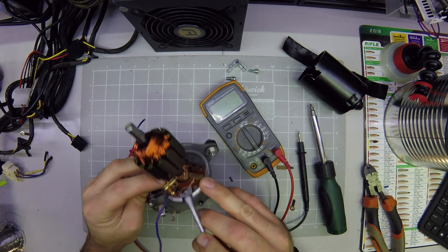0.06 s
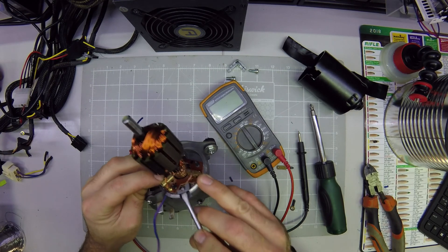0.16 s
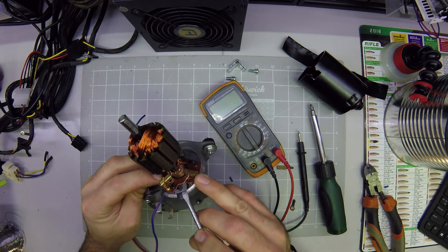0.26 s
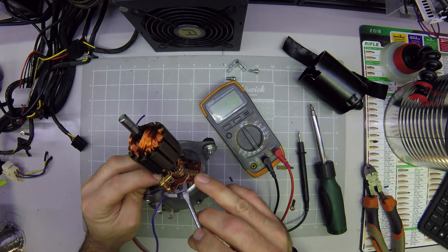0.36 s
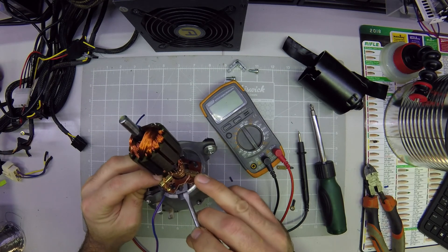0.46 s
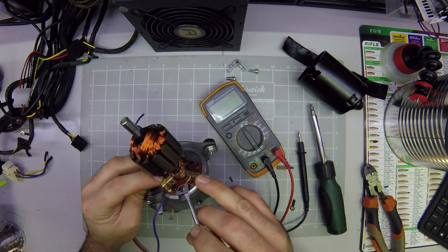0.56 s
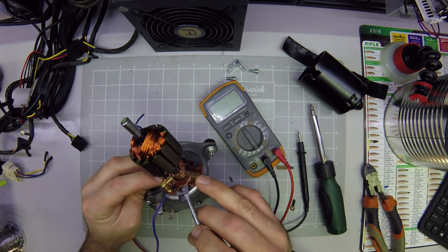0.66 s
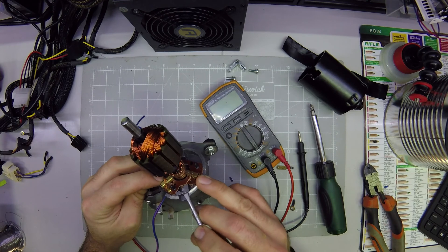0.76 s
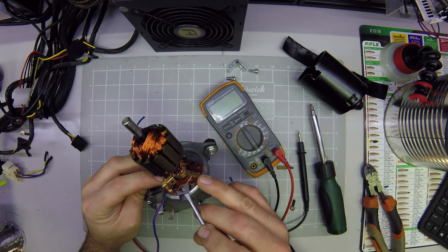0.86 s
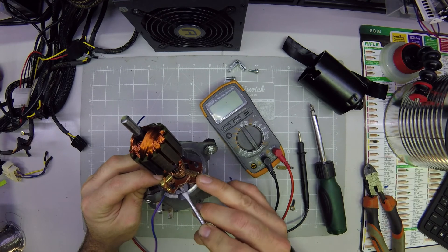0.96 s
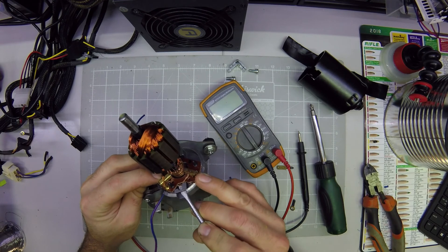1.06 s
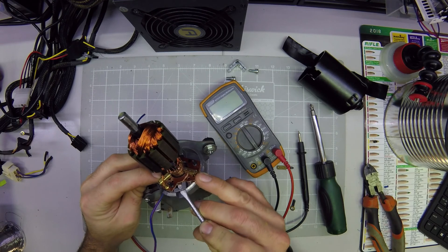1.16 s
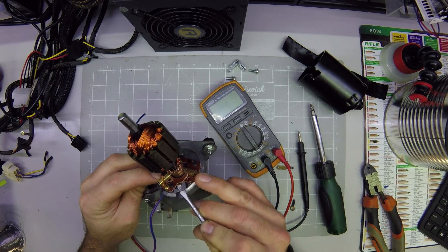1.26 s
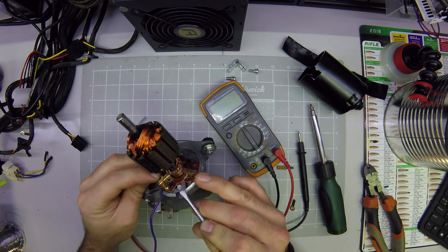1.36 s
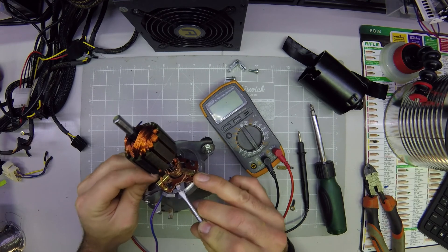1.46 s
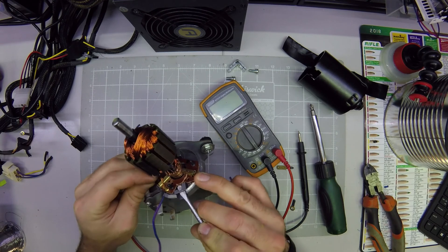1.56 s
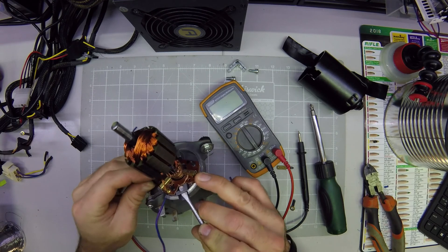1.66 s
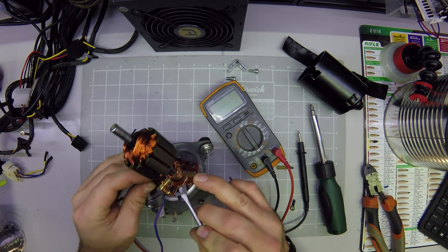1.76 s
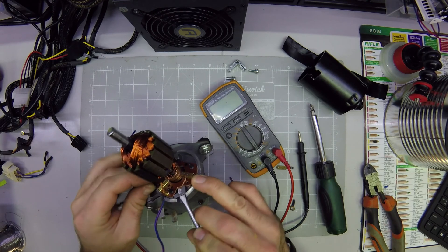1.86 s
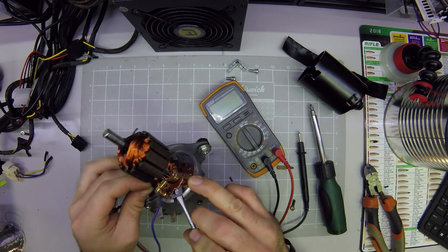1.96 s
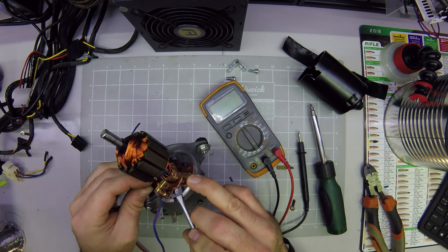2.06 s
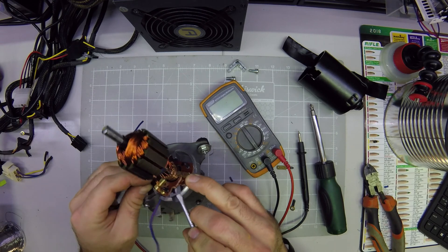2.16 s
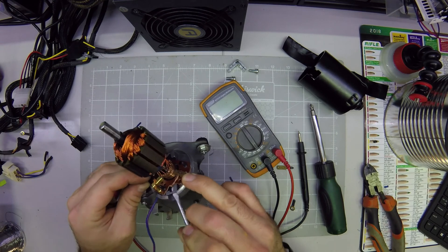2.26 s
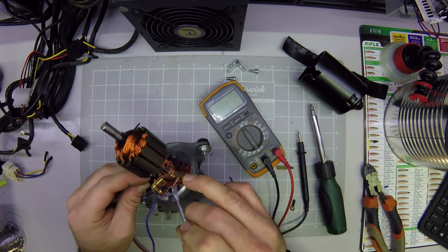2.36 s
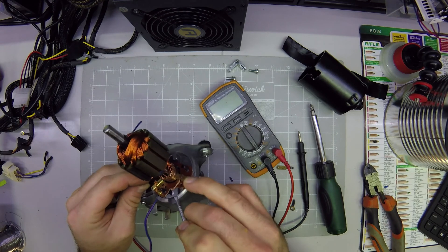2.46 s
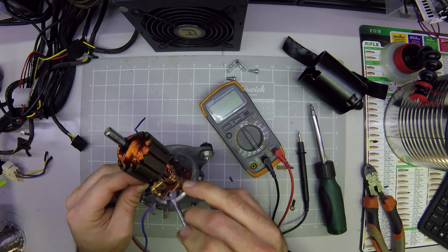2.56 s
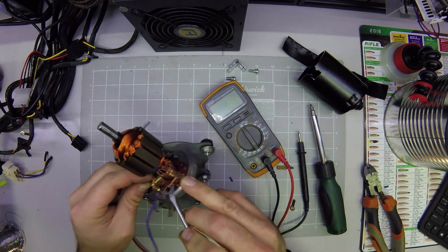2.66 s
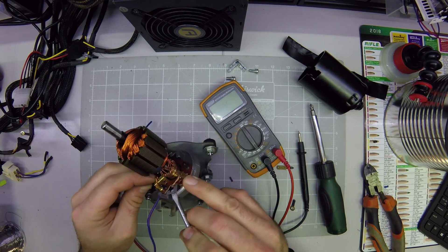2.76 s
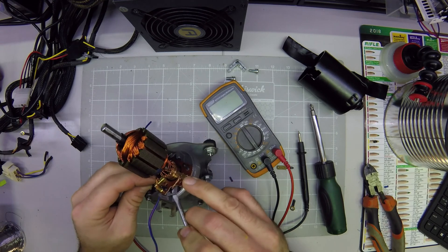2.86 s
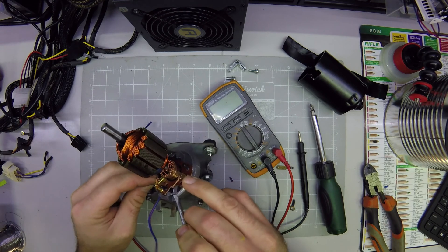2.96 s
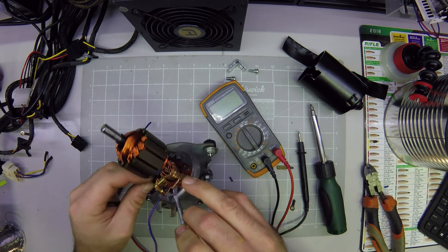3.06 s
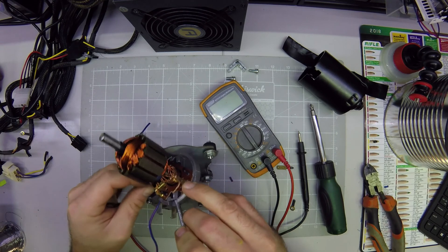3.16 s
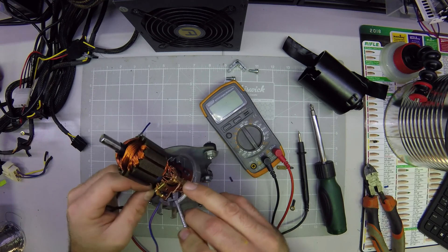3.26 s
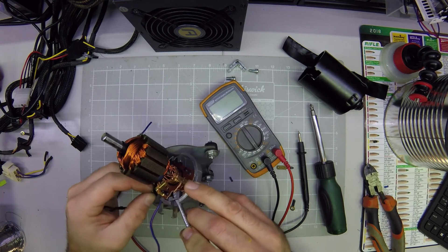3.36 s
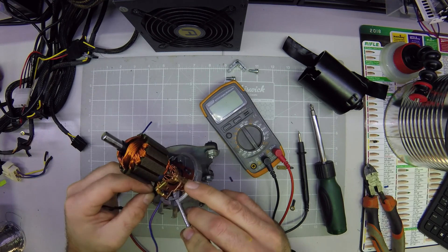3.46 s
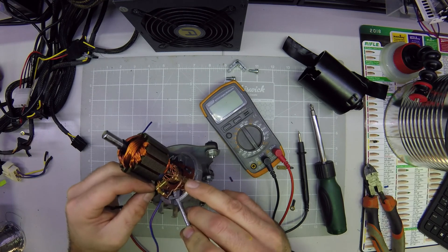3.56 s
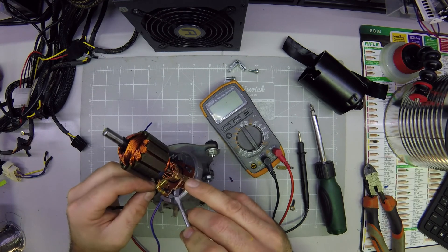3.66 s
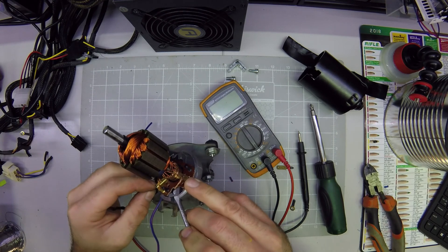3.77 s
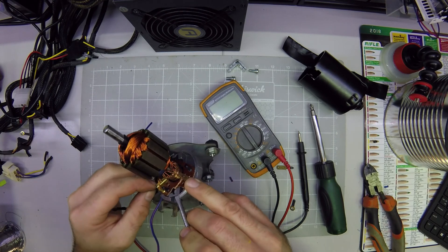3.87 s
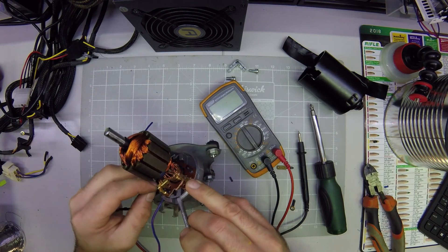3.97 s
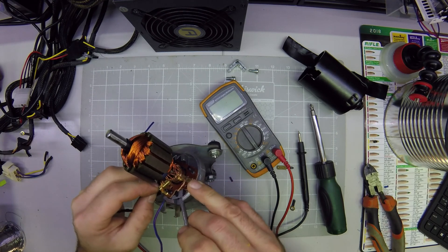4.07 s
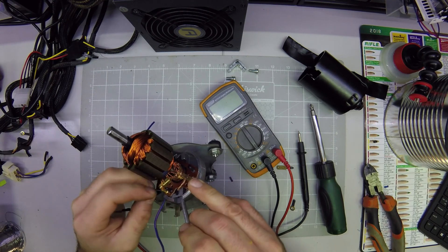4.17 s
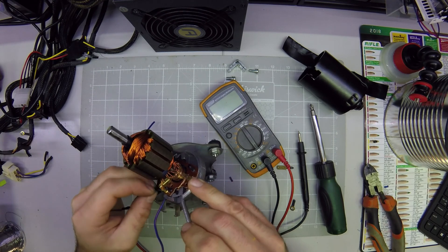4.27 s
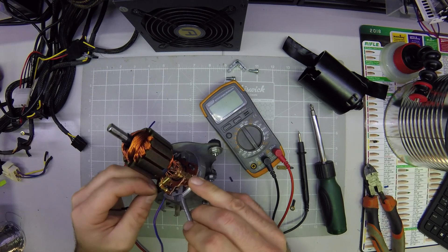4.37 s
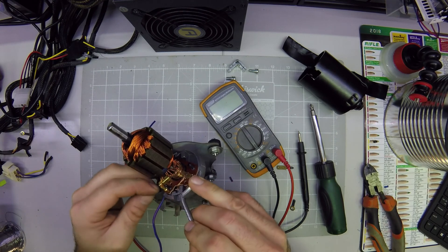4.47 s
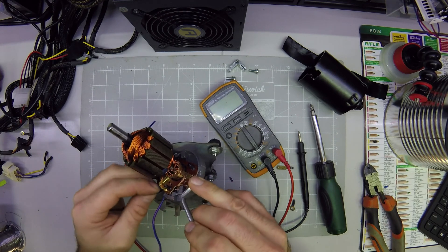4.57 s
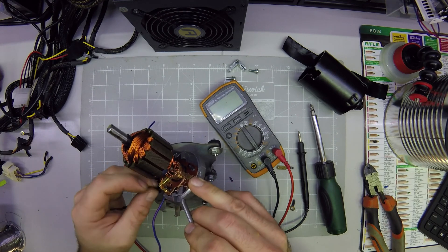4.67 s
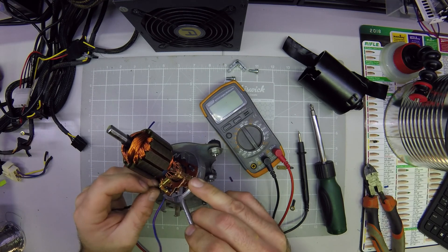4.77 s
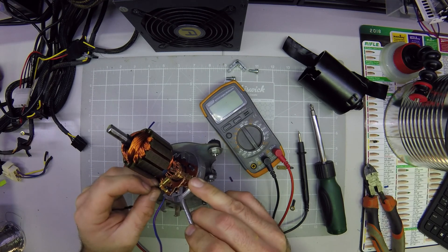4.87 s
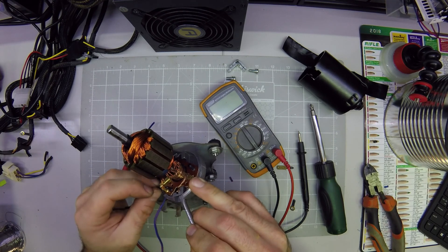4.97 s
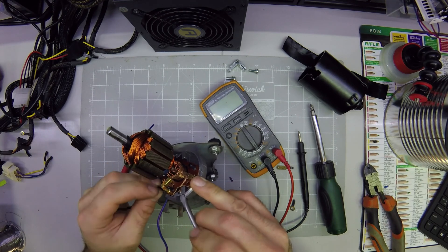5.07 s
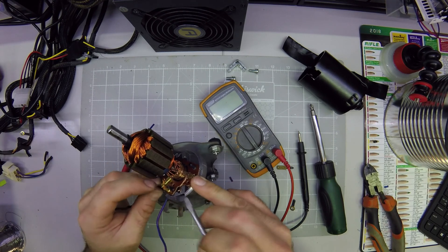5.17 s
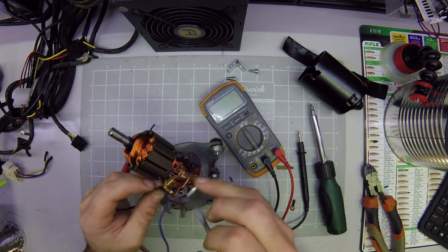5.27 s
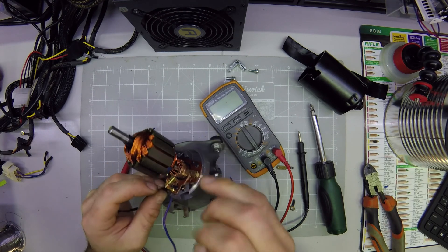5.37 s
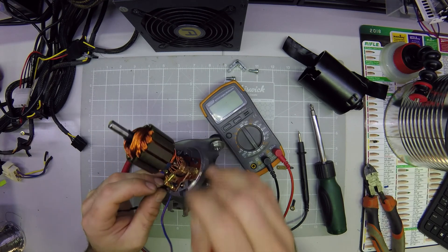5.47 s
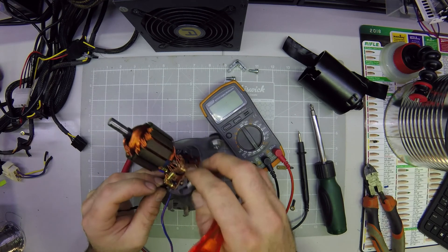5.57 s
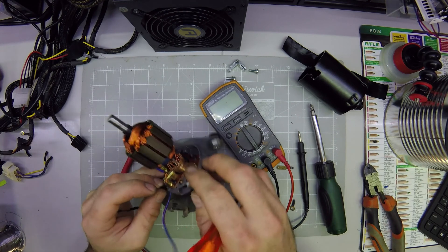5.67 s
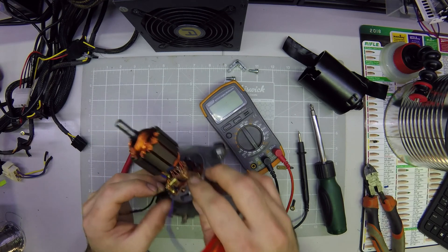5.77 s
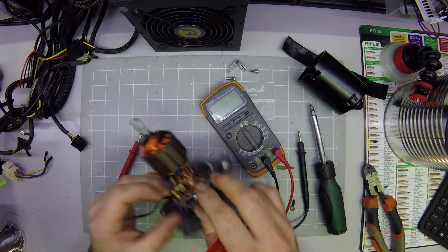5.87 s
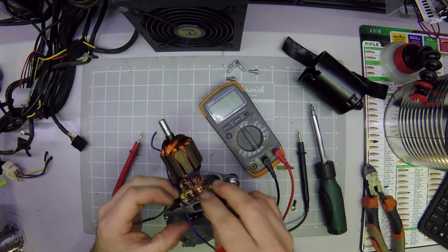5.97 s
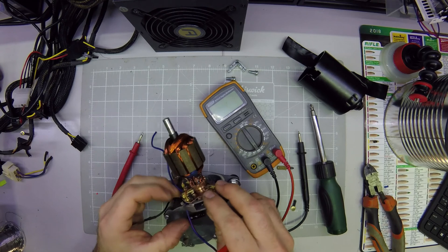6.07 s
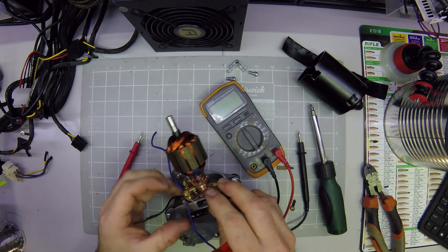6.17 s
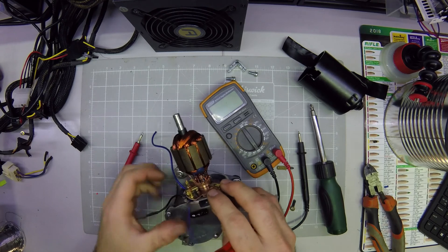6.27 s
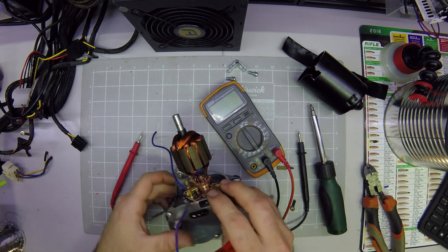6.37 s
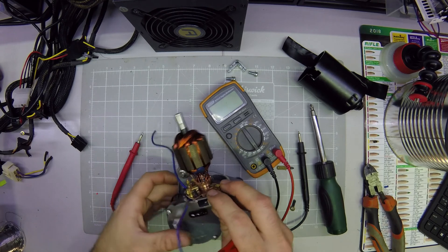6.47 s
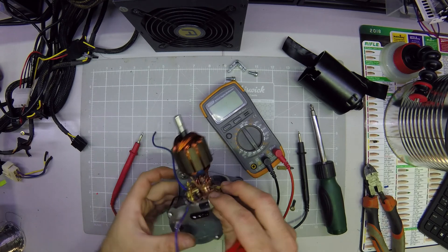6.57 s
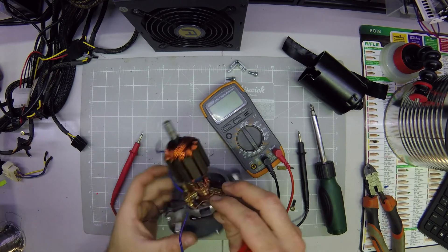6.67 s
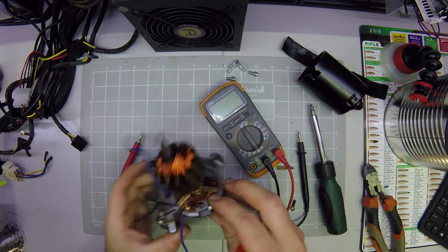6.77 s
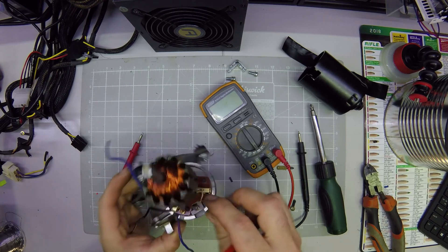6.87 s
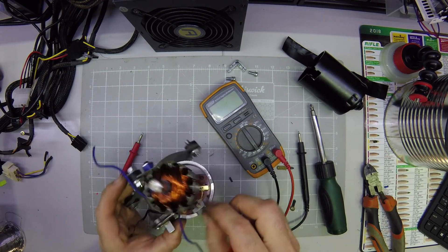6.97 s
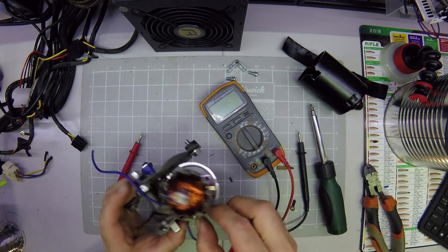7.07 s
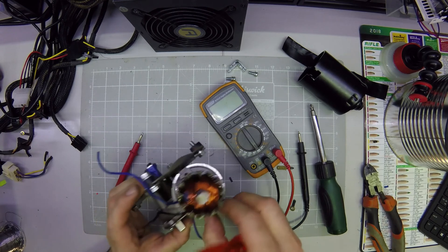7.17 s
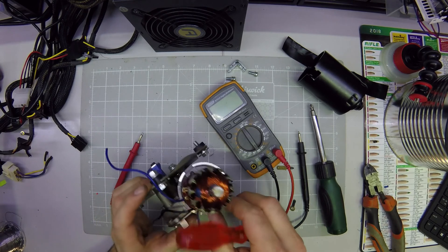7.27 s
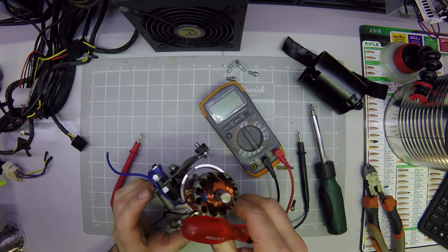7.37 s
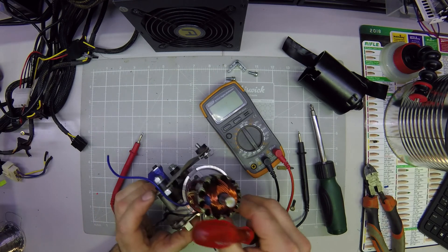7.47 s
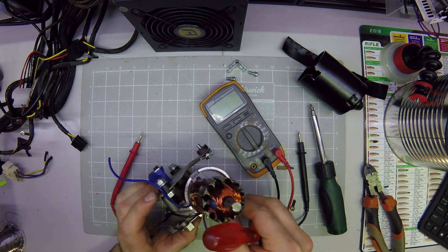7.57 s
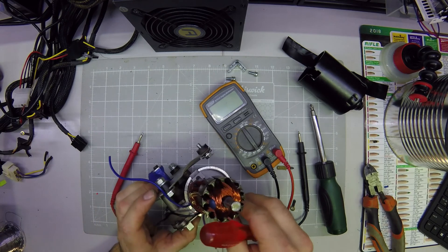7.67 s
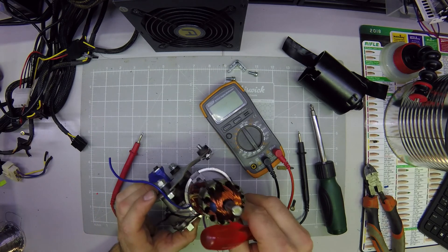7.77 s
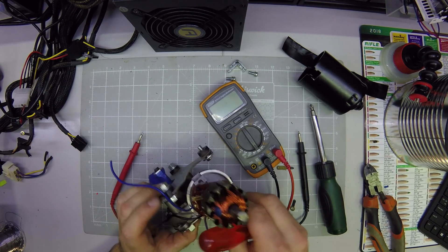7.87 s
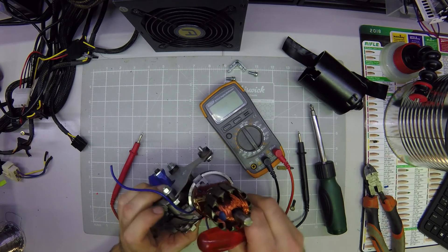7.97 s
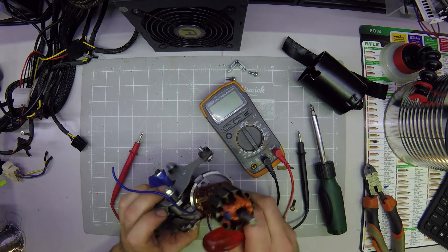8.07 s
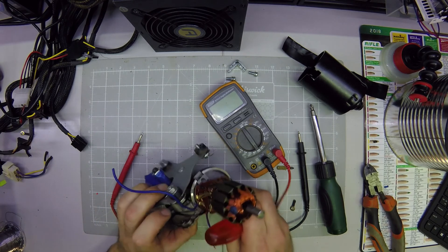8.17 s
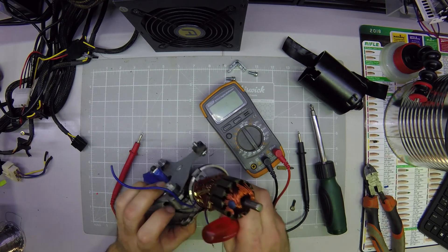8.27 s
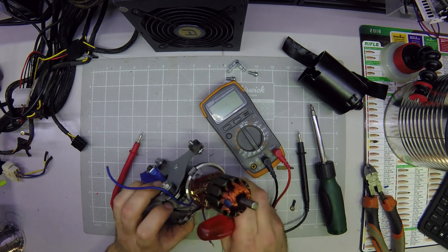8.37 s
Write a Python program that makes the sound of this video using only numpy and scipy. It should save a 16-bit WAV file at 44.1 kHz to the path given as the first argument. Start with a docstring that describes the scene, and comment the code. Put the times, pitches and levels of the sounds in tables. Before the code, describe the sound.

A steady low fan rumble, soft airy noise and wavering mains hum fill a small workshop, with metal handling very close. From 0.1 to 0.35 seconds a steel probe makes a fast cluster of dry, bright ticks; at 0.5 a tiny scratch and faint bench thump. Sparse light ticks continue, with a faint rubbing slide near 1.8 and small scratches around 2.5. At 2.7 a ringing metallic clack lands with a soft boom, and a weaker bump follows at 3.2. Two clearer ticks come at 3.7, then quieter picking, with a tick cluster and scratch at 5.1. A rasp and hiss swell from 5.8 into the loudest knock at 6.0, with deep bench boom and rattle. Sliding and a rattling clack come at 6.3 to 6.8, another heavy, duller thud at 7.3, then faint rubbing, ticks and small knocks until 8.4.

```python
"""Handwork on the rotor and brush holder of a small motor at a workbench, heard close up.
Throughout: workshop rumble, fan air and mains hum, as shaped noise and wavering sines.
From 0.1 s a steel probe ticks on the holder (noise snap + modes); from 0.5 s it scratches (random slips).
From 0.5 s the bench booms softly (pushed modes); from 1.8 s parts slide with rasp and hiss (random slips).
From 2.7 s parts clack (rattle + frame modes); the bench booms loudest for drops at 6.0 s and 7.3 s."""
import sys
import numpy as np
from scipy import signal
from scipy.fft import rfft, irfft, next_fast_len
from scipy.io import wavfile

SR = 44100
rng = np.random.default_rng(int(sys.argv[2]) if len(sys.argv) > 2 else 0)


def waveform_to_disk(signal):
    """Save audio, clipped to [-1, 1], as 16-bit WAV at the path in sys.argv[1]."""
    frames = np.transpose(np.atleast_2d(signal))
    scaled = np.clip(frames, -1, 1) * 32767
    samples = np.round(scaled).astype(np.int16)
    wavfile.write(sys.argv[1], SR, samples)


N = 371889  # samples


def gain_of(db):
    """Decibels to amplitude."""
    return 10 ** (np.asarray(db) / 20)


def evened(x):
    """Scales to rms 1."""
    return x / np.sqrt(np.mean(x ** 2) + 1e-20)


def read(points, hz):
    """Interpolates a table on a log-frequency axis."""
    f, value = np.transpose(points)
    return np.interp(np.log(hz + 1), np.log(f + 1), value)


def add(mix, start_s, sound):
    """Mixes a sound in at a time."""
    part = mix[round(start_s * SR):][:len(sound)]
    part += sound[:len(part)]


def coloured(x, spectrum):
    """Filters a long sound by a spectrum, to rms 1."""
    size = next_fast_len(len(x))
    gain = gain_of(read(spectrum, np.fft.rfftfreq(size, 1 / SR)))
    return evened(irfft(rfft(x, size) * gain, size)[:len(x)])


def drift(rate_hz):
    """Slow random motion of rms 1."""
    count = int(N / SR * rate_hz) + 4
    fine = count * 8
    curve = signal.resample(rng.standard_normal(count), fine)
    return evened(np.interp(np.linspace(0, fine - 1, N), np.arange(fine), curve))


def ring(modes, size=16384):
    """Impulse response of a body: dying sines."""
    t = np.arange(size) / SR
    return sum(gain_of(db - 60 * t / t60_s) * np.sin(2 * np.pi * hz * t) for hz, db, t60_s in modes)


def struck(modes, centre_hz, focus_db, size=8192):
    """Ringing of energy 1; the touched spot favours modes near one frequency."""
    excited = []
    for hz, db, t60_s in modes:
        off_centre_db = focus_db * np.log2(hz / centre_hz) ** 2
        excited.append((hz, db - off_centre_db + rng.standard_normal(), t60_s))
    answer = ring(excited, size=size)
    return answer / np.linalg.norm(answer)


def contact(spectrum, tilt_db_per_octave, pivot_hz, rattle_s, size=4096):
    """Dying burst of tiny collisions, minimum-phase colour tilted above a pivot; energy 1."""
    hz, t = abs(np.fft.fftfreq(size, 1 / SR)), np.arange(size) / SR
    tilt_db = tilt_db_per_octave * np.log2(np.maximum(hz / pivot_hz, 1))
    log_gain = np.log(gain_of(read(spectrum, hz) + tilt_db))
    causal_gain = np.exp(np.conj(signal.hilbert(log_gain)))
    chatter = rng.choice([-1, 1], size) * np.exp(-t / max(rattle_s, 1e-4))
    burst = np.fft.ifft(np.fft.fft(chatter) * causal_gain).real
    return burst / np.linalg.norm(burst)


# fan and building rumble spectrum: f/Hz, relative level/dB
RUMBLE_SPECTRUM = [(8.8, -31), (15, 2), (39, -8), (70, -2), (81, -9), (102, -3.5), (124, -6), (156, -5.5),
                   (173, -20), (210, -15), (320, -32), (420, -58.5), (700, -120)]
# fan air spectrum: f/Hz, relative level/dB
AIR_SPECTRUM = [(160, -0.5), (280, -3), (354, -4.5), (385, -2.5), (412, -5.5), (463, -3.5), (504, -6),
                (627, -2), (820, -7.5), (1450, -11), (2440, -16.5), (3420, -19.5), (6470, -26.5),
                (14700, -35), (15500, -39)]
# mains hum and fan tones: f/Hz, rms level/dB, unsteadiness/share of level
HUM_TONES = [(51.3,-46,0.35), (98.3,-39.5,0.28), (148.7,-51,0.59), (384.3,-60,0.054), (470,-62,1),
             (775,-66,0.28), (890,-80,0.28), (1480,-67,1.)]


def workshop(rumble_db=-38.5, air_db=-47, swell_db=0.75):
    """Fans and building: shaped noise, gently swelling air, tones wavering in level and phase."""
    t = np.arange(N) / SR
    rumble = gain_of(rumble_db) * coloured(rng.standard_normal(N), RUMBLE_SPECTRUM)
    air = gain_of(air_db + swell_db * drift(8)) * coloured(rng.standard_normal(N), AIR_SPECTRUM)
    hum = np.zeros(N)
    for hz, db, unsteady in HUM_TONES:
        waver = 1 + unsteady * (drift(12) + 1j * drift(12))
        tone = (waver * np.exp(2j * np.pi * (hz * t + rng.random()))).real
        hum += gain_of(db) * evened(tone)
    return rumble + air + hum


def faint_ticks(per_s=1.8, level_db=-53, spread_db=2.5, ringing_db=3, centre_hz=5550, octaves=0.21):
    """Shifting grip: faint contacts at random times, as rows like those of TICK_EVENTS."""
    count = int(per_s * N / SR)
    rows = []
    for when, force, spot in rng.uniform(-1, 1, (count, 3)):
        start_s = abs(when) * N / SR
        rows.append((start_s, level_db + spread_db * force, ringing_db, centre_hz * 2 ** (octaves * spot)))
    return rows


# light contacts of probe tip, springs, holder: t/s, relative level/dB, relative ringing/dB, mode centre f/Hz
TICK_EVENTS = [(0.1086,-34.5,-15,4900), (.1241,-39,-8,7300), (0.158,-33.5,-6,3960), (.173,-27.5,7.5,6050),
               (0.2512,-33.5,-7,4800), (.262,-30.5,0,4500), (0.289,-40.5,4,5500), (.3169,-26,-1,5460),
               (0.3463,-35,1,4270), (0.5468,-34,-12,5160), (.629,-39.5,-14,5000), (.853,-38.5,-5,5600),
               (.902,-44.5,7,3400), (0.9818,-38.5,-17,5900), (1.0281,-42,8.5,2930), (1.043,-39.5,10,4300),
               (1.1543,-44.5,10,5500), (1.292,-38.5,-5,6350), (1.705,-50,9,5200), (2.0776,-43.5,-11,7400),
               (2.198,-34.5,2,4900), (2.4443,-38,-1,4770), (2.7353,-34,3,4600), (2.935,-44,-3,5400),
               (3.139,-40,-6,4500), (3.207,-42,-6,4200), (3.7058,-28,-11,4500), (3.7568,-27,0,5000),
               (4.2061,-40,5.5,5670), (4.803,-45,-1,4800), (5.1076,-32,4.5,5370), (5.1333,-34,2,5400),
               (5.195,-29.5,7.5,5430), (5.3354,-51.5,6,5500), (5.988,-17,-5,5950), (6.1455,-41,-4,3970),
               (6.668,-33.5,-12,7400), (7.2139,-38,2,6450), (7.296,-32,-3,5500), (7.548,-46,-4,7500),
               (7.636,-42.5,-3,7100), (7.8222,-38,3,4800), (7.999,-44,-4,7400), (8.066,-40.5,-4,6500),
               (8.32,-39.5,-16,6300)]
# bare contact spectrum: f/Hz, relative level/dB
TICK_SPECTRUM = [(200,-27), (1000,-1), (2500,-8.5), (3400,-2.5), (5500,-1.5), (7500,-2.5), (10000,-10.5),
                 (15000,-16.5)]
# brush holder modes: f/Hz, relative level/dB, t60/s
HOLDER_MODES = [(1490,-6,.03), (2300,-9,.017), (2884,2,0.038), (3385,1.5,0.032), (3920,-3,0.016),
                (4230,1,0.014), (5100,-0.5,0.019), (5453,4,0.025), (6200,-6,0.017), (7080,-14,0.018),
                (8400,-3,0.0103)]
NEUTRAL_HZ, TILT_DB = 6280, 24  # harder spot: brighter by dB/octave of tilt per octave above neutral


def ticks(level_db=17, ring_db=-3, rattle_s=0.0055, rise_s=0.00067, focus_db=28, snap_focus_db=3.5):
    """Small steel parts slip and catch: dry snap, brief holder ringing."""
    out, t = np.zeros(N), np.arange(4096) / SR
    onset = 1 - np.exp(-t / rise_s)
    for start_s, db, ringing_db, centre_hz in TICK_EVENTS + faint_ticks():
        colour = [(hz, colour_db - snap_focus_db * abs(np.log2(hz / centre_hz)))
                  for hz, colour_db in TICK_SPECTRUM]
        snap = contact(colour, TILT_DB * np.log2(centre_hz / NEUTRAL_HZ), 3750, rattle_s)
        holder = gain_of(ring_db + ringing_db) * struck(HOLDER_MODES, centre_hz, focus_db, size=4096)
        add(out, start_s, gain_of(db + level_db) * onset * (snap + holder))
    return out


def friction(slips_per_s, spread_db):
    """Dense tiny slips of uneven size."""
    size = gain_of(spread_db * np.minimum(rng.exponential(1, N), 4))
    return size * rng.choice([-1, 1], N) * (rng.random(N) < slips_per_s / SR)


def pressure(length_s, rise_db=0, attack_s=0.018, release_s=0.013):
    """One stroke: takes hold, pressure changes by rise_db up to its end, lets go."""
    t = np.arange(0, length_s + 10 * release_s, 1 / SR)
    hold = gain_of(rise_db * (np.minimum(t / length_s, 1) - 1))
    release = np.exp(-np.maximum(t - length_s, 0) / release_s)
    return np.minimum(t / attack_s, 1) * hold * release


# probe dragging over holder: t/s, length/s, relative level/dB
SCRATCH_STROKES = [(0.501,0.058,-46.5), (2.468,.035,-48.5), (2.637,0.071,-46), (4.09,0.1,-59),
                   (5.12,0.078,-41.5), (5.632,.018,-50), (8.378,0.033,-55)]
# shaft and fingers sliding in frame: t/s, length/s, relative rasp/dB, hiss/dB, pressure rise/dB
SLIDE_STROKES = [(1.805,0.33,-77,-60.5,1), (5.588,0.2,-60.5,-69,-3), (5.77,0.22,-32.5,-38,23),
                 (6.344,0.31,-58,-55,-0.5), (6.529,0.023,-51,-49.5,9), (6.653,0.07,-49,-58,-2),
                 (6.725,0.035,-52,-46.5,0), (6.764,0.046,-38,-53,6.5), (7.45,0.53,-59,-79,-2),
                 (8.128,0.09,-57,-67,0)]


def strokes(hiss_power=1.45):
    """Strength over time of scratch, rasp and hiss; hiss grows faster with pressure than rasp."""
    scratch, rasp, hiss = np.zeros((3, N))
    for start_s, length_s, db in SCRATCH_STROKES:
        add(scratch, start_s, gain_of(db) * pressure(length_s))
    for start_s, length_s, rasp_db, hiss_db, rise_db in SLIDE_STROKES:
        force = pressure(length_s, rise_db)
        add(rasp, start_s, gain_of(rasp_db) * force)
        add(hiss, start_s, gain_of(hiss_db) * force ** hiss_power)
    return scratch, rasp, hiss


# motor frame modes, also in clacks: f/Hz, relative level/dB, t60/s
FRAME_MODES = [(1010,-10,.04), (1310,-14,0.018), (1360,-18,.05), (1513,11.5,0.023), (1650,1,.022),
               (2120,-18,.03), (2460,-14,0.04), (3270,6.5,0.018), (3600,4,.02)]
# shaft rasp spectrum: f/Hz, relative level/dB
RASP_SPECTRUM = [(400,-21), (800,-2), (1300,8.5), (1800,8.5), (2400,8), (3100,-8.5), (4800,-4), (7000,-29),
                 (12000,-45)]
# finger hiss spectrum: f/Hz, relative level/dB
HISS_SPECTRUM = [(1500, -14), (3500, 4.5), (5500, 3), (8000, -5.5), (11000, -10.5), (15000, -11)]


def scrapes(scratch_db=-2, holder_db=4, frame_db=-9, judder_db=2.0):
    """Slips under each stroke: probe excites holder, shaft judders and rasps in frame, fingers hiss."""
    slips = friction(4000, 1.2)
    rubs = friction(5000, 0.95) * gain_of(judder_db * drift(150))
    holder = evened(signal.oaconvolve(slips, struck(HOLDER_MODES, centre_hz=5050, focus_db=14))[:N])
    frame = evened(signal.oaconvolve(rubs, struck(FRAME_MODES, centre_hz=2200, focus_db=17))[:N])
    scratch = gain_of(scratch_db) * evened(coloured(slips, TICK_SPECTRUM) + gain_of(holder_db) * holder)
    rasp = evened(coloured(rubs, RASP_SPECTRUM) + gain_of(frame_db) * frame)
    hiss = coloured(friction(7000, 3.375), HISS_SPECTRUM)
    scratch_strength, rasp_strength, hiss_strength = strokes()
    return scratch * scratch_strength + rasp * rasp_strength + hiss * hiss_strength


# weight landing on bench: t/s, relative level/dB, contact time/s
THUMP_EVENTS = [(0.546,-26,0.0015), (2.7253,-15.5,0.00087), (3.172,-21.5,0.0014), (5.9865,1,0.0014),
                (6.657,-16.5,0.0054), (7.2962,-0.5,0.0013)]
# bench top modes: f/Hz, relative level/dB, t60/s
BENCH_MODES = [(93,4.5,0.14), (98.8,3.5,0.075), (128,-5,0.083), (187,-5,0.043), (283,-25,0.15),
               (375,-16.5,0.069), (438,-21,0.08), (630,-20.5,0.032)]
# workshop standing waves: f/Hz, relative level/dB, t60/s
STANDING_WAVES = [(163,-28.5,0.58), (355,-37,0.86), (649,-44.5,0.89)]


def thumps(lowest_hz=38):
    """Soft push through the mat: bench booms, room hums; longer contact is duller."""
    out, t = np.zeros(N), np.arange(1024) / SR
    # neighbouring modes start in opposite directions, so the boom swells
    bench = ring(BENCH_MODES[::2]) - ring(BENCH_MODES[1::2])
    # slower flexing hardly radiates
    b, a = signal.butter(1, lowest_hz, "high", fs=SR)
    boom = signal.lfilter(b, a, bench + ring(STANDING_WAVES))
    for start_s, db, contact_s in THUMP_EVENTS:
        push = np.sin(np.pi * np.minimum(t / contact_s, 1)) ** 2
        add(out, start_s, gain_of(db) * signal.fftconvolve(push / push.sum(), boom))
    return out


# heavy parts meeting: t/s, relative level/dB, relative treble/dB, rattle decay/s,
# relative frame ringing/dB, mode centre f/Hz
CLACK_EVENTS = [(2.7169,-27.5,4,0.0054,9.5,1650), (2.7202,-21.5,-14,0.0032,4.5,2010),
                (5.9834,-19,-16,0.0029,-10,2100), (5.9888,-15,-11.5,0.0017,-7,700),
                (6.0025,-17.5,-4,0.0091,-9,2400), (6.6263,-32,-6,0.0074,-12,2300),
                (6.6524,-27,-5,0.0078,0.5,1000), (6.662,-25,-9,0.00639,-6,2000),
                (7.2932,-25,-23,0.0075,-11,1700), (7.4215,-38,-29,0.002,0,1400),
                (8.1379,-40,-1,0.004345,-12,1800), (8.162,-36,-15,0.015,-6,1800),
                (8.219,-33,-17,0.0038,-0.5,1400)]
# bare clack spectrum: f/Hz, relative level/dB
CLACK_SPECTRUM = [(100,-42.5), (400,7.5), (800,-5), (1400,2.5), (2200,4), (3500,-7.5), (7000,-20),
                  (15000,-39)]


def clacks(level_db=18, tilt=0.44, usual_treble_db=-8, focus_db=11):
    """Rotor and frame knock and rattle; the frame rings, more or less per knock."""
    out = np.zeros(N)
    for start_s, db, treble_db, rattle_s, ringing_db, centre_hz in CLACK_EVENTS:
        knock = contact(CLACK_SPECTRUM, tilt * (treble_db - usual_treble_db), 1200, rattle_s)
        frame = struck(FRAME_MODES, centre_hz, focus_db)
        add(out, start_s, gain_of(db + level_db) * knock)
        add(out, start_s, gain_of(db + level_db + ringing_db) * frame)
    return out


# workshop reverberation: f/Hz, t60/s
ROOM_DECAY = [(100, 1), (400, 0.27), (1500, 0.19), (5000, 0.14), (14000, 0.043)]


def room(x, size=22050, gap_s=0.006, reflections_per_s=3000):
    """Sparse reflections from shelves and walls, each band dying at its own speed."""
    present = (rng.random(size) < reflections_per_s / SR) * (np.arange(size) > gap_s * SR)
    taps = rng.choice([-1., 1.], size) * present
    hz, t, bands = signal.stft(taps, SR, nperseg=256)
    decay = gain_of(-60 * t / read(ROOM_DECAY, hz)[:, None])
    tail = signal.istft(bands * decay, SR, nperseg=256)[1]
    return signal.oaconvolve(x, tail / np.linalg.norm(tail))[:N]


def scene(metal_room_db=-15, bench_room_db=-25):
    """Close handling sounds, their reflections and the workshop background."""
    metal = ticks() + clacks() + scrapes()
    bench = thumps()
    reflections = room(gain_of(metal_room_db) * metal + gain_of(bench_room_db) * bench)
    return (metal + bench + reflections + workshop())[None]


def record(dry, edge_hz=15600):
    """Band limit: steep linear-phase low-pass."""
    lowpass = signal.firwin(511, edge_hz, window=("kaiser", 9), fs=SR)
    return signal.oaconvolve(dry, lowpass[None], "same")


dry = scene()
out = record(dry)
waveform_to_disk(out)
```